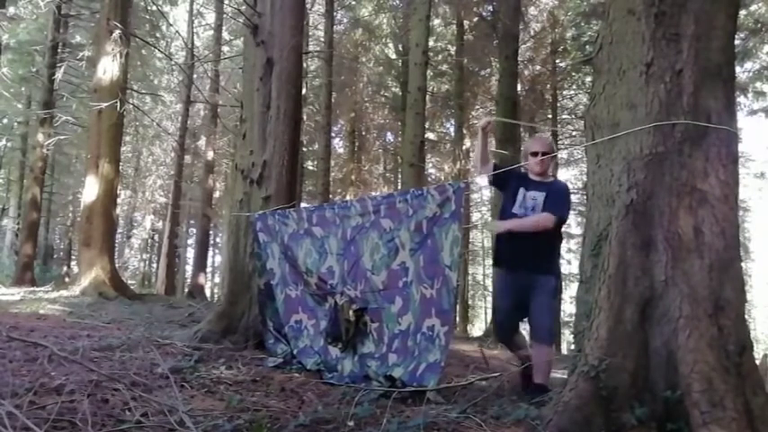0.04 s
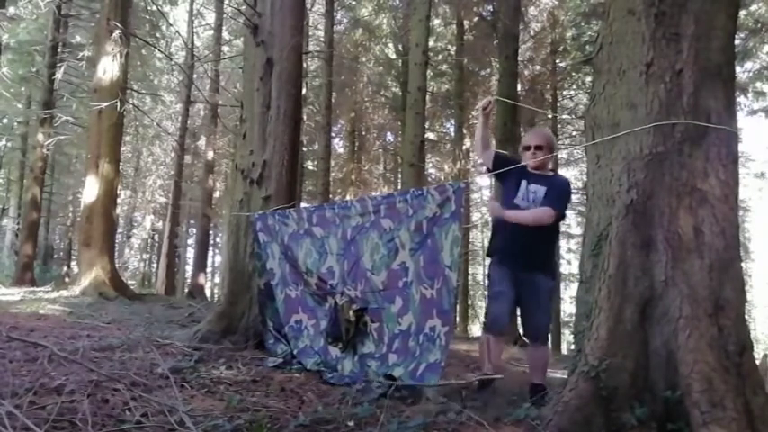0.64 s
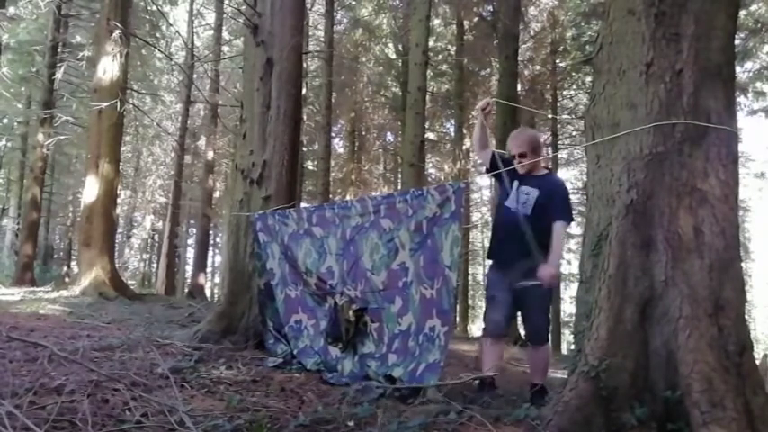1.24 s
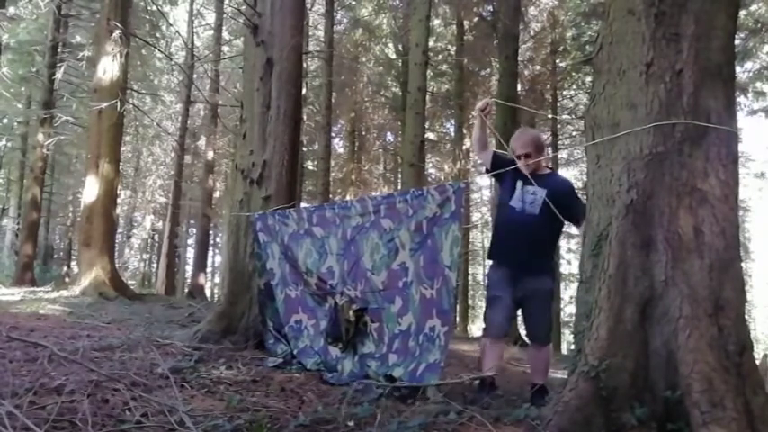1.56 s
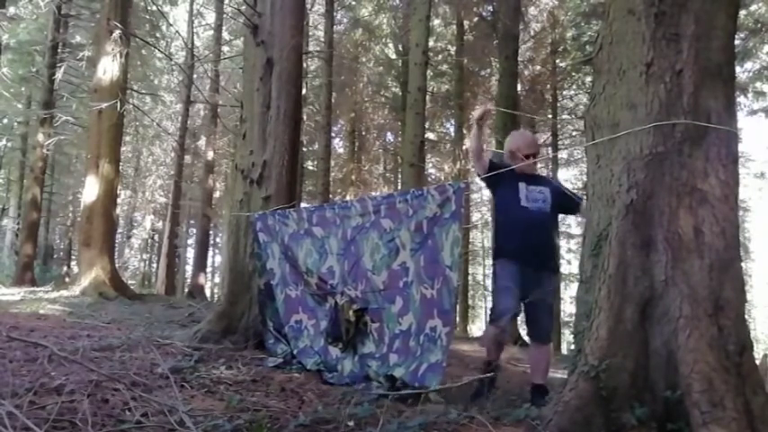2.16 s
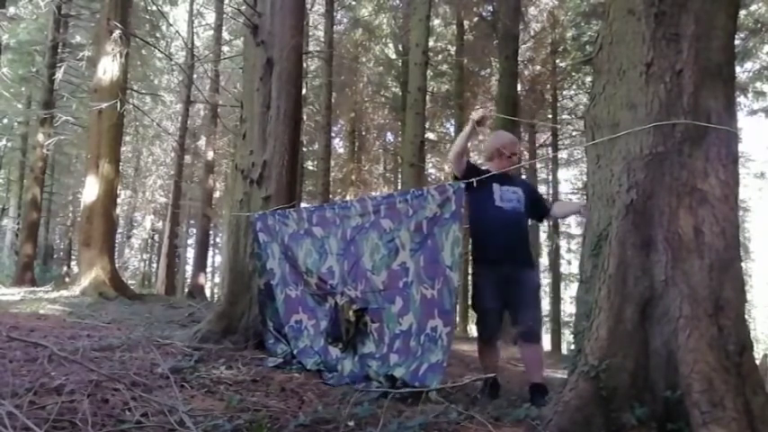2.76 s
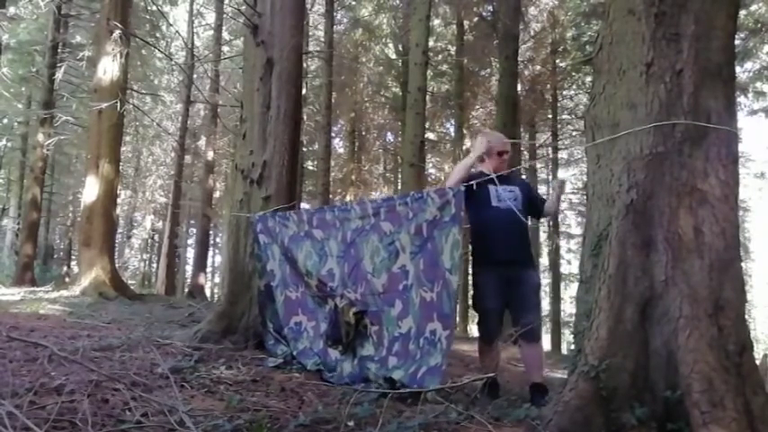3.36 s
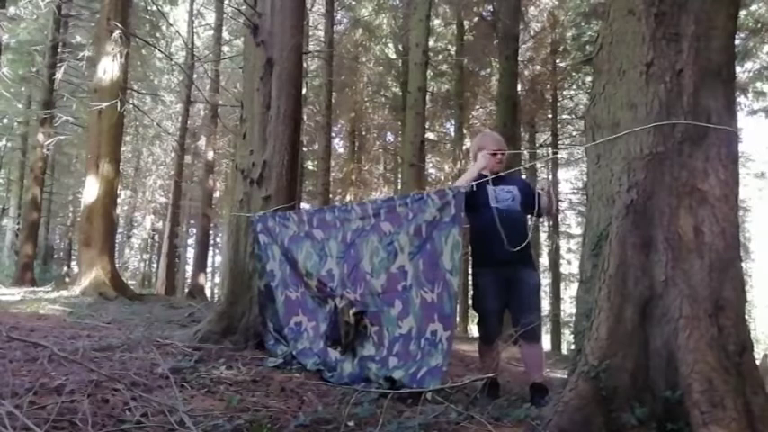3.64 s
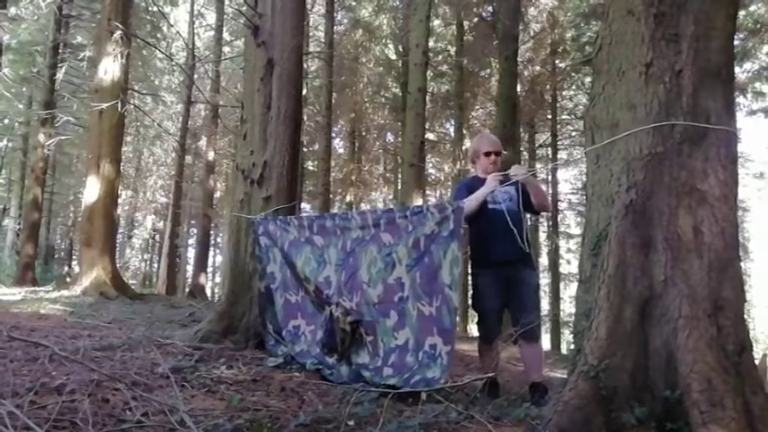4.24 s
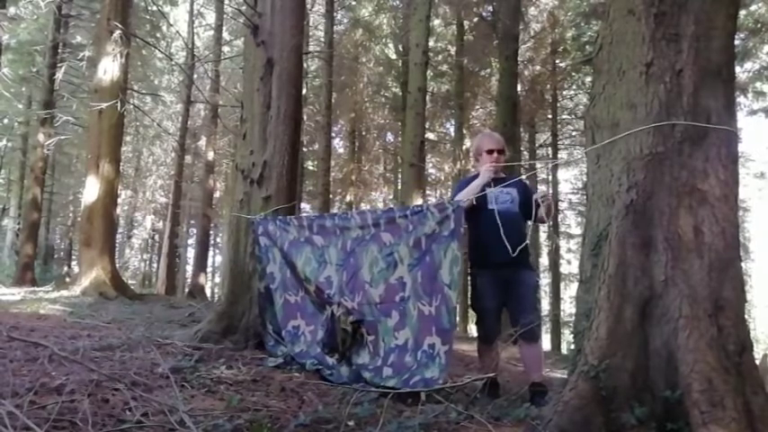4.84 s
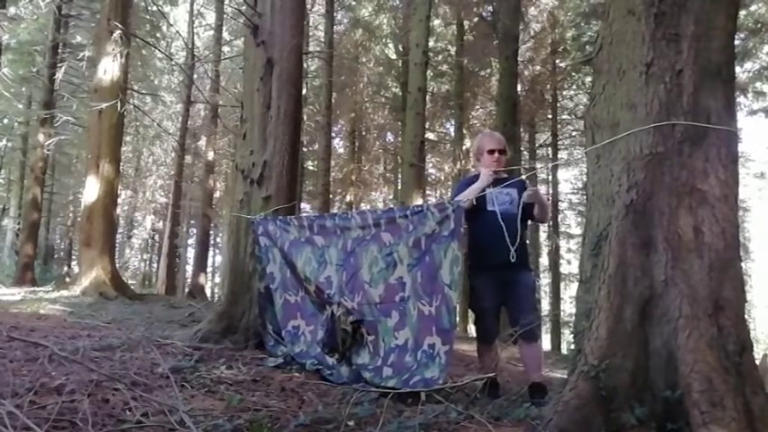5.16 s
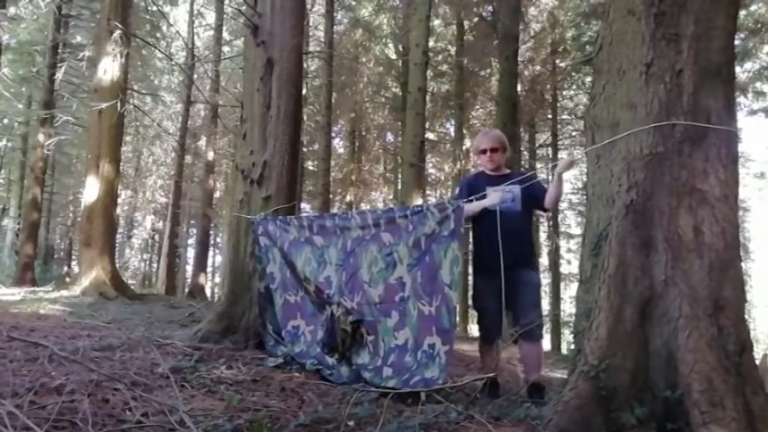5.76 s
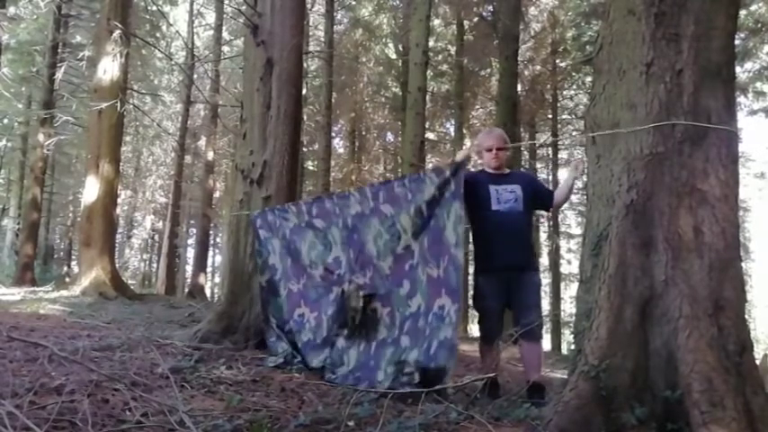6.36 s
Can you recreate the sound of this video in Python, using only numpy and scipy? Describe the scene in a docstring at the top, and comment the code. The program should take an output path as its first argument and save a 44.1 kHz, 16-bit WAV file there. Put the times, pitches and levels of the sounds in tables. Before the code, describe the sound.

In a quiet wood, feet scuff on dry needles and snap twigs sharply. A waterproof poncho rustles and crackles in short, soft bursts as it is handled. A crow caws once, very faint and far away, and a foot knocks a stick. Later a cord slips through the hands and zips once as it is pulled tight. The microphone is a few metres away, with faint hiss and a low breeze behind.

```python
"""Cloth rustles and crackles and twigs snap as a poncho is strung between trees in a quiet conifer wood.
Creases in the coated cloth buckle; feet scuff and thud on dry litter and knock a stick.
The cord rubs through the hands and zips once as it is pulled tight. A crow caws far off,
over hiss and a low breeze. Trunks scatter every crack. The microphone, a few metres away,
has a bright peak near 8 kHz, carried in the spectrum tables."""
import sys
import numpy as np
from scipy import signal
from scipy.fft import rfft, irfft, next_fast_len
from scipy.io import wavfile
from scipy.ndimage import uniform_filter1d

SR = 44100
rng = np.random.default_rng(int(sys.argv[2]) if len(sys.argv) > 2 else 0)


def wav_out(sig):
    """Save sig, one row per channel (or a flat mono array), as 16-bit PCM at SR to the path in sys.argv[1]."""
    wavfile.write(sys.argv[1], SR, np.round(np.clip(np.atleast_2d(sig).T, -1, 1) * 32767).astype(np.int16))


N = 282681
TAPS = 2048

# cloth dragged along the cord: start_s, length_s, level_db, body_re_crisp_db
CLOTH_TUGS = [(0.04, 0.034, -55, -9.5), (0.15, 0.034, -57.5, -9), (0.23, .06, -66, -7), (1.2, .12, -68, -9),
              (1.39, .11, -53.5, -6), (2.1, 0.13, -54.5, -10), (2.29, 0.027, -55.5, -11),
              (2.67, 0.14, -67.5, -11.5), (3.33, .04, -71.5, -9.5), (3.83, 0.19, -68.5, -5),
              (4.09, 0.043, -62, -7), (4.22, .03, -68.5, -9), (4.44, 0.06, -60, -9.5),
              (4.66, .02, -71.5, -6), (4.795, .015, -74, -5), (5.23, 0.071, -71, -3),
              (5.45, 0.035, -75, -12), (5.85, 0.0099, -62.5, -8.5), (6.17, .02, -70.5, -7),
              (6.365, .045, -59.5, -10.5)]
# feet scuffing litter: start_s, length_s, level_db, body_re_crisp_db
FOOT_SCUFFS = [(0.47, 0.15, -52.5, -8.5), (0.6, .12, -44.5, -12), (0.8, .1, -50, -13), (1.7, 0.06, -63, -8),
               (2.39, 0.1, -55.5, -8.5), (4.595, 0.016, -60.5, -4)]
# crisp top of the rustle: freq_hz, density_db
CRISP_SPECTRUM = [(2000, -40), (5000, -26), (6700, -3.5), (7400, -6), (8450, 3.5), (9500, -6.5),
                  (11000, -16), (13000, -20.5), (15500, -25)]
# lower scrape of the rustle: freq_hz, density_db
BODY_SPECTRUM = [(150, -24), (500, -11.5), (1000, -5), (1600, -5.5), (2500, 1), (3300, 0), (4500, 2),
                 (6000, -0.5), (9000, -24.5)]
# creases buckling: start_s, level_db, length_s, body_db, treble_db
CREASE_BUCKLES = [(0.022, -57, 0.006, -8, -3.0), (0.192, -56.5, 0.0037, -9, -7),
                  (0.258, -56, 0.0027, -7, 2), (0.387, -59.5, 0.016, 2, -2), (1.253, -56.5, 0.002, -17, -6),
                  (1.361, -36.5, 0.014, -5, -6), (1.38, -39.5, 0.0091, 1, 7.5),
                  (2.215, -54.5, 0.013, 0.5, 2), (2.277, -51, 0.0097, 2, -5),
                  (2.291, -55, 0.0083, -9.0, -5), (2.403, -50, 0.003, -6, -2),
                  (3.056, -44, 0.0028, -16, -16), (3.114, -64.5, 0.021, 0.5, -3),
                  (3.229, -61, 0.004, -10.5, -3.5), (3.878, -50.5, 0.0018, -8.5, 3.0),
                  (4.086, -56.5, 0.016, -9, 3), (4.228, -58.5, 0.015, 0, -12),
                  (4.397, -43.5, 0.007, 1, -6.5), (4.408, -50, 0.0068, -4, -8),
                  (4.422, -44.0, 0.0095, -3, -11), (4.432, -50, 0.0054, 3, -7),
                  (5.201, -47, 0.0037, 0, -23), (6.279, -60.5, 0.0033, -8.5, -6),
                  (6.363, -59, 0.0043, -18, -1)]
# one buckle: freq_hz, density_db
CREASE_SPECTRUM = [(400, -42), (1200, -28.5), (1900, -15.5), (2700, -14.5), (3300, -20), (4400, -13),
                   (5300, -8), (6700, -5.5), (8200, 1), (9400, -4.5), (10800, -15), (15500, -24)]
# twigs breaking: start_s, level_db, length_s, body_db, treble_db
TWIG_SNAPS = [(0.5825, -26.5, 0.0084, 3.5, 9), (0.672, -47, 0.02, -2, -16),
              (0.749, -16.5, 0.0057, -4.5, -4.5), (0.917, -45, 0.0037, -1, -12),
              (0.926, -39.5, 0.0044, -3, 5.5), (1.132, -55.5, 0.0032, -1, -2),
              (1.4825, -44.5, 0.0024, 3, -6), (1.495, -52, 0.0066, 10, -4),
              (1.692, -50.5, 0.0045, 11, -3.5), (1.701, -43.5, 0.0098, 9.5, -2),
              (1.845, -55.5, 0.0056, 6.0, -8), (2.413, -48.5, 0.0053, 8, -6),
              (2.743, -48, 0.0015, 4.5, -0.5), (4.572, -51.5, 0.013, 5, -4)]
# one fracture: freq_hz, density_db
TWIG_SPECTRUM = [(150, -41.5), (450, -28), (750, -30.5), (1050, -24), (1450, -27), (2300, -15.5),
                 (3200, -21.5), (4500, -17.5), (5600, -15), (6800, -8.5), (8400, -3), (9800, -9),
                 (11800, -24.5), (15500, -22.5)]
# cord slipping through the hands: start_s, level_db, length_s, tight_ring_db
CORD_SLIPS = [(3.315, -63.5, 0.023, -7.5), (3.362, -65, 0.0063, -20), (3.376, -60, 0.0036, -19.5),
              (3.804, -68, 0.013, -18), (3.827, -64, 0.016, -7), (3.92, -64.5, 0.011, -4),
              (4.021, -63, 0.025, 4), (5.225, -57.5, .008, -9), (5.649, -63.5, 0.0059, -7),
              (5.663, -51.5, 0.0038, 7), (5.7264, -30.5, 0.0023, -9.5), (5.728, -34, 0.0036, 1),
              (5.7334, -35.5, 0.01, 15)]
# cord resonances, tight ring first: centre_hz, width_hz, gain_db
CORD_MODES = [(7590, 255, 5), (2240, 370, -16), (4555, 760, -1.5), (6330, 990, -10), (8430, 940, -3.5)]
# knocks of feet and taut cloth: start_s, relative_db, pitch_hz, decay_s
DULL_KNOCKS = [(0.055, -63, 222, 0.014), (0.385, -61, 245, 0.017), (0.476, -59.5, 190.4, 0.0091),
               (0.581, -38.5, 297, 0.0073), (0.621, -46, 147.6, 0.016), (0.749, -37.5, 173, 0.0049),
               (2.399, -69, 291, 0.02), (4.234, -62, 195, .012), (5.728, -62.5, 181, 0.022)]
# dry stick: freq_hz, gain_db, decay_s
STICK_MODES = [(1770, -7, 0.0059), (2030, 1, 0.0036), (2790, -1, .0035), (4500, -7, .002)]
# caw harmonics, fundamental first: gain_db
CAW_PARTIALS_DB = [-7.5, -2.5, 1.5, -17]
# reverberation of the wood: freq_hz, t60_s
FOREST_DECAY = [(150, 0.14), (600, 0.47), (2000, 0.32), (5000, 0.46), (8000, 0.39), (14000, 0.2)]
# still air and microphone hiss: freq_hz, density_db
HISS_SPECTRUM = [(100, -99.5), (200, -106), (320, -109), (500, -114), (750, -115), (1300, -112),
                 (2000, -115), (3200, -116), (5500, -117), (7000, -117), (8500, -113), (10000, -120),
                 (12000, -124), (15500, -125)]
# breeze rumble: freq_hz, density_db
BREEZE_SPECTRUM = [(10, -20), (22, -7.5), (48, 5), (65, -1), (95, 1.5), (140, -10), (220, -18.5),
                   (400, -34.5)]
# breeze easing: time_s, level_db
BREEZE_LEVELS = [(0, -68), (1.0, -65.5), (3.3, -75), (6.41, -72.5)]
# left-right likeness of direct sound: freq_hz, correlation
DIRECT_CORRELATION = [(150, .9), (500, .4), (1200, 0.39), (3000, .55), (6000, 0.32), (8400, 0.74),
                      (15000, 0.67)]
# left-right likeness of rustle and echoes: freq_hz, correlation
NEAR_CORRELATION = [(100, 1), (300, .7), (700, 0.27), (1400, 0.65), (3000, 0.0038), (5000, 0), (8000, 1),
                    (15000, 0.93)]
# left-right likeness of hiss and breeze: freq_hz, correlation
AIR_CORRELATION = [(60, 1), (130, .9), (290, .4), (640, -0.31), (1400, 0.39), (3100, -0.16), (6500, -0.34),
                   (9000, 0.24), (15000, 1)]
# left-channel phase shift per band: freq_hz, shift_rad
LEFT_PHASE_SHIFT = [(150, -1), (1200, 1.5), (2200, 1.04), (4500, 3), (6000, 2.5), (7300, 1.5),
                    (10000, 0.06), (15000, 1.5)]


def rustle(uneven_db=1.3, uneven_hz=35, idle_crisp_db=-80, idle_body_db=-88.5):
    """Rubbing cloth and trodden needles: a crisp top over a drier, lower scrape."""
    feet = strokes(FOOT_SCUFFS, rise_db_per_s=200, ease_db_per_s=14.5, fall_db_per_s=190)
    cloth = strokes(CLOTH_TUGS, rise_db_per_s=329, ease_db_per_s=28, fall_db_per_s=211.5)
    # hanging cloth never lies quite still
    idle = amp(np.array([[idle_crisp_db], [idle_body_db]]) + 2.5 * wander(N, 10)) ** 2
    crisp_gain, body_gain = np.sqrt(feet + cloth + idle) * amp(uneven_db * wander(N, uneven_hz))
    crisp = grains(CRISP_SPECTRUM) * crisp_gain * pan(side_db=-4)
    body = grains(BODY_SPECTRUM) * body_gain * pan(side_db=-6)
    return crisp + body


def strokes(rows, rise_db_per_s, ease_db_per_s, fall_db_per_s):
    """Crisp and body power: each stroke swells, eases with the pressure, then dies away."""
    t, power = np.arange(0, N, 64) / SR, 0
    for start_s, length_s, level_db, body_db in rows:
        age_s = t - start_s
        drop_db = (rise_db_per_s * np.maximum(-age_s, 0)
                   + ease_db_per_s * np.clip(age_s, 0, length_s)
                   + fall_db_per_s * np.maximum(age_s - length_s, 0))
        power = power + amp([level_db - drop_db, level_db + body_db - drop_db]) ** 2
    return np.array([np.interp(np.arange(N) / SR, t, part) for part in power])


def grains(spectrum, spread_db=3.0, clump_db=1.5, clump_hz=170):
    """Dense, clumped friction clicks of one colour, rms 1."""
    sizes = amp(spread_db * np.minimum(rng.exponential(1, N), 5) + clump_db * wander(N, clump_hz))
    clicks = rng.standard_normal((2, N)) * sizes * (rng.random(N) < .5)
    return unit(colour(folds(pair(clicks, NEAR_CORRELATION)), spectrum))


def folds(x, depth_db=2.8, patch_frames=6, patch_bins=3):
    """Small folds favour their own pitches: brief spectral patches, alike in both channels."""
    bands = signal.stft(x, SR, nperseg=256)[2]
    patches = uniform_filter1d(rng.standard_normal(bands.shape[:0:-1]), patch_frames, axis=0)
    patches = uniform_filter1d(patches, patch_bins, axis=1)
    return signal.istft(bands * amp(depth_db * unit(patches).T), SR, nperseg=256)[1][:, :x.shape[-1]]


def creases():
    """Coated cloth buckles in sharp-edged runs of clicks."""
    buckles = crackles(CREASE_BUCKLES, CREASE_SPECTRUM, rise=.18, fade=.82, spread_db=2.5, settle_db=-11)
    return buckles * pan(side_db=-7.5)


def twigs():
    """Twigs break underfoot in swelling runs of fractures."""
    snaps = crackles(TWIG_SNAPS, TWIG_SPECTRUM, rise=.98, fade=.9, spread_db=4.5, settle_db=-13)
    return snaps * pan(side_db=-4)


def crackles(rows, spectrum, rise, fade, spread_db, settle_db, settle_s=.006):
    """Runs of tiny clicks, then weaker ones as the material settles; rise and fade scale with the run."""
    out, hz, t = np.zeros((2, N)), np.fft.rfftfreq(TAPS, 1 / SR), np.arange(TAPS) / SR
    body_shelf = read([(4500, 0.99), (7000, 0.0076)], hz)
    treble_shelf = read([(9000, 0), (12000, 1)], hz)
    for start_s, level_db, length_s, body_db, treble_db in rows:
        swell = (1 - np.exp(-t / (rise * length_s))) * np.exp(-fade * t / length_s)
        settle = amp(settle_db) * np.exp(-fade - abs(t - length_s) / settle_s)
        envelope = np.where(t < length_s, swell, settle)
        sizes = amp(spread_db * np.minimum(rng.exponential(1, TAPS), 4))
        clicks = rng.standard_normal((2, TAPS)) * sizes * envelope * (rng.random(TAPS) < .5)
        ring = causal(read(spectrum, hz) + body_db * body_shelf + treble_db * treble_shelf)
        burst = pair(signal.fftconvolve(clicks, ring[None], axes=1), DIRECT_CORRELATION)
        run_samples = max(round(length_s * SR), 20)
        add(out, start_s, amp(level_db) * burst * np.sqrt(2 * run_samples / np.sum(burst ** 2)))
    return out


def cord(grip_shift=0.0094):
    """Friction bursts excite the cord: a purer ring when tight, other modes shifting with the grip."""
    out, hz, t = np.zeros((2, N)), np.fft.rfftfreq(TAPS, 1 / SR), np.arange(TAPS) / SR
    tight, *others = [amp(gain_db) / (1 + (2 * (hz - centre_hz) / width_hz) ** 2)
                      for centre_hz, width_hz, gain_db in CORD_MODES]
    for start_s, level_db, length_s, tight_ring_db in CORD_SLIPS:
        scrape = np.interp(hz, hz * (1 + grip_shift * rng.standard_normal()), sum(others))
        ring = causal(20 * np.log10(amp(tight_ring_db) * tight + scrape))
        friction = rng.standard_normal((2, TAPS)) * (t < length_s)
        rub = pair(signal.fftconvolve(friction, ring[None], axes=1)[:, :TAPS], DIRECT_CORRELATION)
        add(out, start_s, amp(level_db) * unit(rub) * np.sqrt(length_s * SR / TAPS))
    return out * pan(side_db=-7)


def thuds(rise_s=0.00064, sag=0.2, sag_s=0.021, scatter_turns=0.18, gain_db=2):
    """Soft ground or taut cloth answers a push with a few damped, uneven, sinking cycles."""
    out, t = np.zeros((2, N)), np.arange(SR // 5) / SR
    for start_s, relative_db, pitch_hz, decay_s in DULL_KNOCKS:
        turns = np.cumsum(pitch_hz * (1 + sag * (np.exp(-t / sag_s) - .5))) / SR
        tone = np.sin(2 * np.pi * (turns + scatter_turns * wander(len(t), pitch_hz / 2)))
        envelope = (1 - np.exp(-t / rise_s)) * np.exp(-t / decay_s)
        add(out, start_s, amp(relative_db + gain_db) * tone * envelope)
    return out * pan(side_db=-0.5)


def stick(start_s=2.414, gain_db=-42.5, rise_s=0.00057):
    """A foot knocks a dry stick; its damped modes give one clack."""
    out, t = np.zeros((2, N)), np.arange(TAPS) / SR
    ring = sum(amp(db) * np.sin(2 * np.pi * hz * t) * np.exp(-t / decay_s)
               for hz, db, decay_s in STICK_MODES)
    add(out, start_s, amp(gain_db) * ring * (1 - np.exp(-t / rise_s)))
    return out * pan(side_db=-2)


def crow(start_s=1.87, length_s=0.159, level_db=-72, pitch_hz=497, jitter=0.045, rasp_db=4):
    """One hoarse, distant caw: harmonics on an unsteady pitch, lower and quieter at both ends."""
    out, t = np.zeros((2, N)), np.arange(0, length_s, 1 / SR)
    ends = 1 - np.sin(np.pi * t / length_s)
    arch_hz = pitch_hz * (1 - 0.0597 * ends)
    turns = np.cumsum(arch_hz * (1 + jitter * wander(len(t), 259.6))) / SR
    voice = sum(amp(db) * np.sin(2 * np.pi * k * turns) for k, db in enumerate(CAW_PARTIALS_DB, 1))
    hoarse = unit(voice * amp(rasp_db * wander(len(t), 169.2)))
    add(out, start_s, hoarse * signal.windows.tukey(len(t), .15) * amp(level_db - 8 * ends))
    return out


def forest(x, echoes_per_s=2500, build_s=0.002, lump_db=1.0):
    """Many trunks scatter echoes; each band dies at its own rate."""
    t = np.arange(SR) / SR
    echoes = rng.standard_normal((2, SR)) * (rng.random((2, SR)) < echoes_per_s / SR)
    echoes *= (1 - np.exp(-t / build_s)) * amp(lump_db * wander(SR, 60))
    hz, age_s, bands = signal.stft(pair(echoes, NEAR_CORRELATION), SR, nperseg=256)
    decay = amp(-60 * age_s / read(FOREST_DECAY, hz)[:, None])
    tail = signal.istft(bands * decay, SR, nperseg=256)[1]
    return signal.fftconvolve(x.mean(0)[None], tail / np.linalg.norm(tail[0]), axes=1)[:, :N]


def air(hiss_db=-71, flicker_db=1.0, swell_db=1.0):
    """Air and microphone hiss over the low rumble of an easing breeze."""
    hiss = unit(colour(pair(rng.standard_normal((2, N)), AIR_CORRELATION), HISS_SPECTRUM))
    rumble = unit(colour(pair(rng.standard_normal((2, N)), AIR_CORRELATION), BREEZE_SPECTRUM))
    breeze_db = np.interp(np.arange(N) / SR, *np.transpose(BREEZE_LEVELS)) + swell_db * wander(N, 8)
    return hiss * amp(hiss_db + flicker_db * wander(N, 60)) + rumble * amp(breeze_db)


def widen(x):
    """Shift the left channel's phase per band, setting the stereo width of cracks and cord."""
    size = next_fast_len(N)
    shift_rad = read(LEFT_PHASE_SHIFT, np.fft.rfftfreq(size, 1 / SR))
    left = irfft(rfft(x[0], size) * np.exp(-1j * shift_rad), size)[:N]
    return np.array([left, x[1]])


def amp(db):
    """Decibels to gain."""
    return 10 ** (np.asarray(db) / 20)


def unit(x):
    """Scale to rms 1."""
    return x / np.sqrt(np.mean(x ** 2) + 1e-20)


def read(points, hz):
    """Interpolate a table over log frequency."""
    freq_hz, value = np.transpose(points)
    return np.interp(np.log(hz + 1), np.log(freq_hz + 1), value)


def add(mix, start_s, sound):
    """Add a sound into the stereo mix."""
    part = mix[:, max(round(start_s * SR), 0):][:, :sound.shape[-1]]
    part += sound[..., :part.shape[-1]]


def delayed(x, delay_s):
    """Delay a stereo sound."""
    return np.pad(x, ((0, 0), (round(delay_s * SR), 0)))[:, :N]


def pan(side_db):
    """Stereo gains of mean power 1; negative is right."""
    return unit(amp([[side_db / 2], [-side_db / 2]]))


def colour(x, spectrum):
    """Filter by a spectrum table."""
    size = next_fast_len(x.shape[-1])
    gain = amp(read(spectrum, np.fft.rfftfreq(size, 1 / SR)))
    return irfft(rfft(x, size) * gain, size)[..., :x.shape[-1]]


def causal(gain_db):
    """Minimum-phase impulse response: rings only after the blow."""
    log_gain = np.r_[gain_db, gain_db[-2:0:-1]] * np.log(10) / 20
    return np.fft.ifft(np.exp(np.conj(signal.hilbert(log_gain)))).real


def pair(x, correlation):
    """Blend two independent channels to a correlation per band."""
    size = next_fast_len(x.shape[-1])
    a, b = rfft(x, size)
    same = np.clip(read(correlation, np.fft.rfftfreq(size, 1 / SR)), -1, 1)
    mid, side = a * np.sqrt((1 + same) / 2), b * np.sqrt((1 - same) / 2)
    return irfft([mid + side, mid - side], size)[:, :x.shape[-1]]


def wander(size, rate_hz):
    """Smooth random drift, rms 1."""
    knots = rng.standard_normal(2000)
    return unit(np.interp(np.arange(size) * rate_hz / SR, np.arange(len(knots)), knots))


def scene(trunk_s=0.009, trunk_db=-15, crack_wet_db=-12, cord_wet_db=-9, crow_wet_db=2):
    """Cloth, feet, cord and crow, with the nearest trunk's echo and the wood around them."""
    cracks = twigs() + thuds() + stick() + creases()
    slips, caw = cord(), crow()
    direct = widen(cracks + slips) + caw + rustle()
    trunk_echo = amp(trunk_db) * delayed(cracks, trunk_s)
    send = amp(crack_wet_db) * cracks + amp(cord_wet_db) * slips + amp(crow_wet_db) * caw
    return direct + trunk_echo + forest(send) * pan(side_db=-3) + air()


def record(dry):
    """The recorder's band limit."""
    lowpass = signal.firwin(511, cutoff=15850, window=("kaiser", 9), fs=SR)
    return signal.oaconvolve(dry, lowpass[None], "same")


dry = scene()
out = record(dry)
wav_out(out)
```